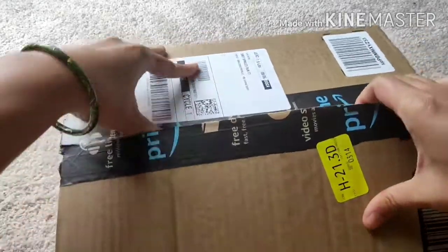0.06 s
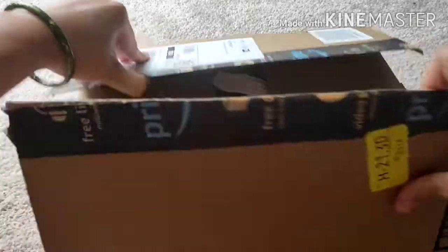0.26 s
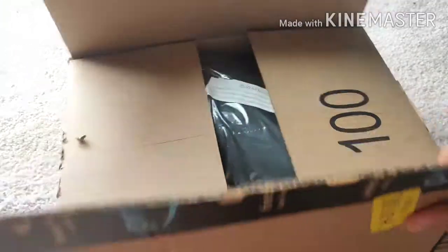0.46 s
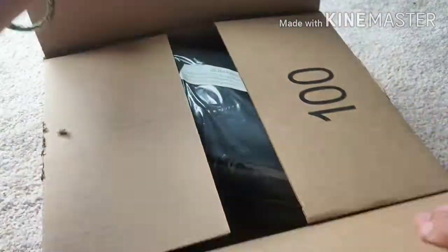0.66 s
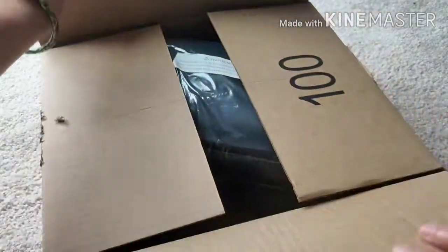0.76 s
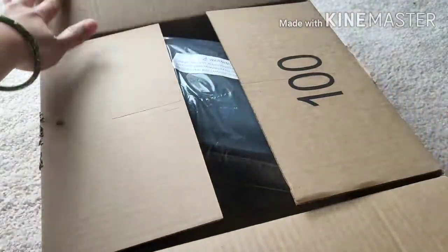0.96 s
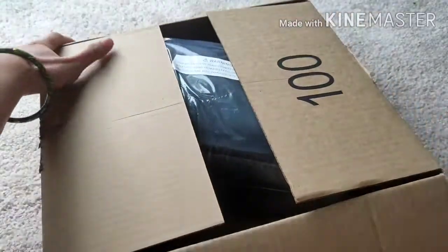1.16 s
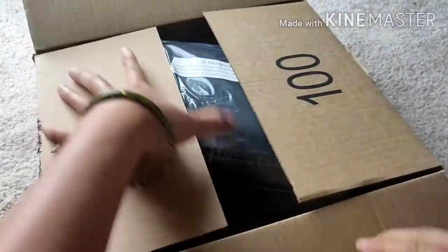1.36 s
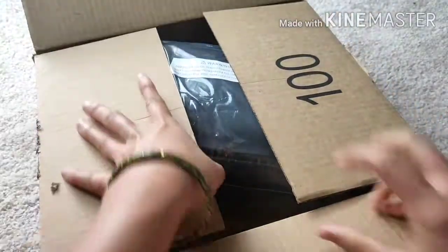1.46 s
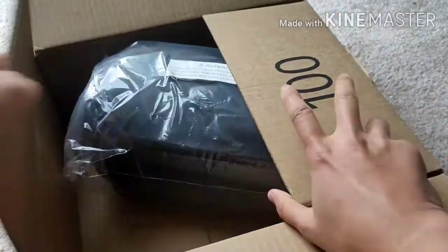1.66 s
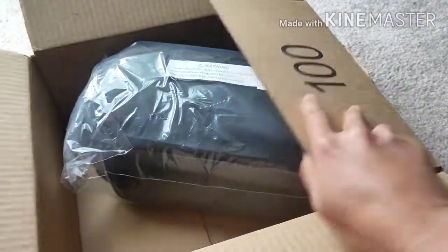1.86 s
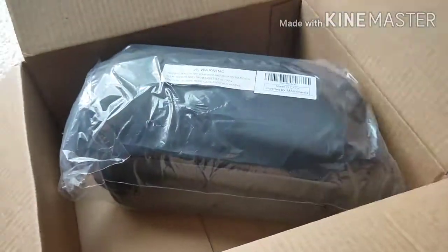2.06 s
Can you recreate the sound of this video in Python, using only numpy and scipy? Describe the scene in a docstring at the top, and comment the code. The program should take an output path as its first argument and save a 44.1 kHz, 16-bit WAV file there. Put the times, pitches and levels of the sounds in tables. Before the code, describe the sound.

Cardboard flaps snap open twice amid soft scraping and finger bumps in a small room.

```python
"""A small carpeted room, where hands fold open the flaps of a cardboard box close to a phone.
Two flaps snap over: the crease cracks, the panel gives a hollow knock, the loose flaps chatter.
Around the snaps fingers bump the panels, creases and nails tick, board rubs on board in tiny
slips, and a dry sliding hiss comes and goes, all in a short room tail over faint room tone."""
import sys
import numpy as np
from scipy import signal
from scipy.fft import rfft, irfft
from scipy.io import wavfile
from scipy.ndimage import uniform_filter1d

SR = 44100
rng = np.random.default_rng(int(sys.argv[2]) if len(sys.argv) > 2 else 0)


def generate_wav(sig):
    """Save sig (samples, or channels by samples) to the path in sys.argv[1] as 16-bit PCM at SR."""
    pcm = np.round(np.clip(np.atleast_2d(sig).T, -1, 1) * 32767).astype(np.int16)
    wavfile.write(sys.argv[1], SR, pcm)


N = 92610  # 2.1 s


def undb(db):
    """Decibels to gain."""
    return 10 ** (np.asarray(db) / 20)


def unit(x):
    """Scale to an rms of 1."""
    return x / np.sqrt(np.mean(x ** 2) + 1e-20)


def since(start):
    """Seconds since start, zero before it."""
    return np.maximum(np.arange(N) / SR - start, 0)


def fade(t, t60):
    """Exponential decay, 60 dB down after t60 seconds."""
    return np.exp(-np.log(1000) * np.maximum(t, 0) / max(t60, 1e-3))


def swell(t, rise, t60):
    """Smooth attack, then exponential decay."""
    return np.sin(np.pi / 2 * np.clip(t / max(rise, 1e-4), 0, 1)) ** 2 * fade(t - rise, t60)


def bins():
    """Frequency of each spectral bin."""
    return np.maximum(np.arange(N // 2 + 1) * SR / N, 1)


def curve(hz, values):
    """Join breakpoints along a log frequency axis."""
    return np.interp(np.log(bins()), np.log(hz), values)


def colour(x, points):
    """EQ through (f/Hz, level/dB) points, keeping the power of white noise."""
    hz, db = np.array(points).T
    return irfft(rfft(x) * unit(undb(curve(hz, db))), N)


def focus(hz, octave_db):
    """Bell curve around hz, octave_db down one octave away."""
    return undb(-octave_db * np.log2(bins() / hz) ** 2)


def spread(pair, wide_hz=1770):
    """Two unrelated signals to left and right: alike in the bass, apart in the treble."""
    width = bins() / np.hypot(bins(), wide_hz)
    mid, side = rfft(pair)
    return irfft(np.array([mid + width * side, mid - width * side]), N)


def noise():
    """White noise at the two microphones."""
    return spread(rng.standard_normal((2, N)))


def slips(per_s=1700, scatter_db=3):
    """Tiny stick-slip releases at random times and of uneven size."""
    hit = rng.random(N) < per_s / SR
    size = undb(scatter_db * rng.standard_normal(N))
    return spread(unit(hit * size * rng.standard_normal((2, N))))


# EQ of the still room: f/Hz, level/dB
ROOM_TONE_EQ = [(30, -6.5), (80, -8.5), (200, -8), (400, -1.5), (750, -5.5), (1030, 0.5), (1430, -26),
                (1900, -16), (3900, -29.5), (7400, -15), (8400, -25.5)]


def room_tone():
    """Still air: a faint, dark bed of steady noise."""
    return undb(-70) * colour(noise(), ROOM_TONE_EQ)


# Reverb bands: f/Hz, level against the send/dB, t60/s
REVERB_BANDS = [(59.5, -13, 1), (136, -10.5, 0.16), (316, -11.5, 0.2), (600, -21, 0.34), (950, -12.5, 0.31),
                (1980, -8.5, 0.27), (4000, -7.5, 0.22), (7500, -8.5, 0.2)]


def reverb(send, predelay_s=0.009, build_s=0.008, smooth_hz=45):
    """The carpeted room's short tail: each band has its own decay, and no single tone stands out."""
    hz, db, t60s = np.array(REVERB_BANDS).T
    scatter, t, tail = rfft(noise()), since(predelay_s), 0
    for share, t60 in zip(np.eye(len(hz)), t60s):
        band = irfft(scatter * curve(hz, share), N)
        tail = tail + band * swell(t, build_s, t60)
    response = rfft(tail)
    power = uniform_filter1d(np.mean(abs(response) ** 2, axis=0), int(smooth_hz * N / SR))
    tail = irfft(response / np.sqrt(power) * undb(curve(hz, db)), N)
    return signal.fftconvolve(send, tail[:, :N // 2], axes=1)[:, :N]


# Resonances of the box: f/Hz, width/Hz, relative level/dB
BOX_MODES = [(173, 160, 30), (319.4, 66, 4.5), (527, 26.7, 4), (871, 130, 14.5), (1750, 420, 10)]
# Gap between the resonances: f/Hz, width/Hz
BOX_NOTCHES = [(1450, 290)]
SLIP_FOCUS_DB, TOUCH_FOCUS_DB = 7, 4  # drop in drive one octave from a contact's centre


def box(drive, emphasis):
    """The hollow body: a contact stirs its resonances, weighted by the emphasis curve."""
    f = bins()
    gain = sum(undb(db) / (1 + 1j * (f / hz - hz / f) * hz / width) for hz, width, db in BOX_MODES)
    gain *= (1j * f / (110 + 1j * f)) ** 2  # low cut
    gain /= 1 + 1j * f / 1300 - (f / 1300) ** 2  # high cut
    for hz, width in BOX_NOTCHES:
        gain *= 1 - 1 / (1 + 1j * (f / hz - hz / f) * hz / width)
    return irfft(rfft(drive) * unit(gain * emphasis), N)


def radiate(motion, cut_hz=72):
    """Small panels lose their deepest bass."""
    return signal.sosfilt(signal.butter(2, cut_hz, "high", fs=SR, output="sos"), motion)


# Light slides of hands and flaps: t/s, length/s, hiss level/dB, rustle level/dB
SLIDES = [(0.034, 0.4, -66.5, -62), (0.417, 0.65, -66, -70), (1.053, 0.13, -68.5, -59.5),
          (1.2, 0.13, -68.5, -66), (1.342, 0.54, -65.5, -67), (1.843, 0.19, -68, -71),
          (2.003, 0.17, -65.5, -96)]
# EQ of the dry hiss: f/Hz, level/dB
HISS_EQ = [(500, -16.5), (2000, -11.5), (3900, -15.5), (5500, -12.5), (6400, -8), (7300, 3.5), (8400, -7.5)]


def sliding(edge_s=0.039, waver_db=2.37, waver_s=0.04, rustle_hz=198):
    """Skin and flaps slide lightly: a wavering hiss over a rustle of the box's lowest resonance."""
    hiss_gain, rustle_gain = np.zeros((2, N))
    for start, length, hiss_db, rustle_db in SLIDES:
        t = since(start)
        speed = np.clip(np.minimum(t, length - t) / edge_s, 0, 1)
        hiss_gain += undb(hiss_db) * speed
        rustle_gain += undb(rustle_db) * speed
    pressure = np.interp(since(0) / waver_s, np.arange(N), rng.standard_normal(N))
    hiss = hiss_gain * colour(noise(), HISS_EQ)
    rustle = box(rustle_gain * slips(), focus(rustle_hz, SLIP_FOCUS_DB))
    return undb(-waver_db * pressure) * (hiss + rustle)


# Rubbing strokes: t/s, length/s, body level/dB, grit level/dB, centre f/Hz
RUBS = [(0.0, 0.051, -55, -65, 528), (0.069, 0.033, -54.5, -68.5, 650), (0.152, 0.052, -57, -82, 695),
        (0.2262, 0.012, -44, -55.5, 846), (0.237, 0.0047, -39, -51, 224), (0.458, 0.034, -63, -69, 850),
        (0.827, 0.089, -57.5, -59, 560), (0.902, 0.083, -59, -62, 556), (1.09, 0.078, -60, -75, 452),
        (1.2396, 0.033, -49.5, -64.5, 760), (1.254, 0.03, -57, -55, 673), (1.37, 0.069, -61.5, -81, 837),
        (1.38, 0.087, -63, -72.5, 192), (1.508, 0.31, -65, -71, 807.5), (1.856, 0.033, -52.5, -87, 880),
        (1.822, 0.19, -59, -61.5, 443), (2.022, 0.089, -65.5, -91, 505)]
# EQ of the paper fibres' grit: f/Hz, level/dB
GRIT_EQ = [(300, -34), (1400, 3.5), (2100, 5.5), (3000, 3), (3900, 1.5), (4900, 1), (5800, 1), (7200, 13.5),
           (8400, 4.5)]


def rubs(rise_share=0.34):
    """Board rubs on board: slips drive the box and shed a fine grit."""
    body, grit_power = np.zeros((2, N)), np.zeros(N)
    for start, length, body_db, grit_db, hz in RUBS:
        force = np.sqrt(np.interp(since(start) / length, [0, rise_share, 1], [0, 1, 0]))
        body += undb(body_db) * box(force * slips(), focus(hz, SLIP_FOCUS_DB))
        grit_power += (undb(grit_db) * force) ** 2
    grit = colour((slips() + noise()) / np.sqrt(2), GRIT_EQ)
    return body + np.sqrt(grit_power) * grit


# Small catches: t/s, box ring level/dB, click level/dB, click f/Hz
TICKS = [(0.055, -57, -66.5, 1800), (0.2318, -32.5, -48.5, 2190), (0.88, -51, -58, 5700),
         (1.0811, -54.5, -56.5, 5620), (1.0884, -65, -55.5, 5400), (1.148, -62, -73, 5130),
         (1.269, -45.5, -58, 7400)]


def ticks(ring_hz=800):
    """A crease or a fingernail catches: a crisp click and a short ring of the box."""
    clicks, contact = np.zeros((2, N)), np.zeros(N)
    for start, ring_db, click_db, hz in TICKS:
        catch = swell(since(start), rise=0.00087, t60=0.023)
        band = irfft(rfft(noise()) * unit(focus(hz, octave_db=25.5)), N)
        clicks += undb(click_db) * catch * band
        contact += undb(ring_db) * catch
    return clicks + box(contact * noise(), focus(ring_hz, TOUCH_FOCUS_DB))


# Soft thuds of fingers and panels: t/s, level/dB, panel f/Hz, box ring level/dB
BUMPS = [(0.001, -35, 170, -44.5), (0.058, -49, 334, -67), (0.079, -63, 317, -54), (0.127, -40, 173.6, -55),
         (0.141, -58, 257, -58), (0.183, -50, 290, -58), (0.657, -49.5, 204, -63),
         (0.843, -47.5, 543, -57.5), (0.870, -41, 236, -50.5), (0.9, -38, 146.4, -57),
         (0.936, -38.5, 225, -59.5), (1.081, -49.5, 300, -54.5), (1.089, -39.5, 435, -62),
         (1.093, -35.5, 189, -85), (1.148, -50, 216, -61), (1.245, -42, 703, -67), (1.259, -39.5, 240, -65),
         (1.268, -43, 224, -72), (1.530, -49.5, 317, -59.5), (1.611, -47.5, 275, -51.5),
         (1.791, -45, 251, -77), (1.847, -52.5, 265, -54.5)]


def bumps(ring_hz=480):
    """Each soft contact sways one panel and stirs the box's lower resonances."""
    sway, contact = np.zeros((2, N))
    for start, db, hz, ring_db in BUMPS:
        t = since(start)
        sway += undb(db) * swell(t, rise=0.0062, t60=0.037) * np.sin(2 * np.pi * hz * t)
        contact += undb(ring_db) * swell(t, rise=0.003, t60=0.035)
    return radiate(sway) + box(contact * noise(), focus(ring_hz, TOUCH_FOCUS_DB))


def chatter(cues, centre_hz=416):
    """At each (t/s, level/dB) cue the loose flaps shiver on the box and settle."""
    force = sum(undb(db) * swell(since(start), rise=0.032, t60=0.11) for start, db in cues)
    return box(force * slips(), focus(centre_hz, SLIP_FOCUS_DB))


def knock(t, modes):
    """A flap's bending waves swell, the slow ones mostly last, and the lossy board soon stops them."""
    motion = np.zeros(N)
    for hz, db, rise, decay in modes:
        damping = fade(np.maximum(t - rise, 0) ** 2 / decay, decay)  # half a bell curve
        motion += undb(db) * swell(t, rise, t60=1e3) * damping * np.sin(2 * np.pi * hz * t)
    return radiate(motion)


# Bending modes of each flap: f/Hz, level/dB, attack/s, decay/s
OUTER_FLAP = [(159.8, -13, 0.0087, 0.018), (333.7, -9.5, 0.0128, 0.0081), (480, -35, 0.018, 0.015),
              (605.5, -25, 0.0089, 0.021), (743, -22, 0.0037, 0.013), (906, -18.5, 0.01, 0.0086),
              (1112, -27.5, 0.0075, 0.024), (1710, -31, 0.0029, 0.0083), (2144, -33.5, 0.0025, 0.009)]
INNER_FLAP = [(164, -40.5, 0.0075, 0.041), (310, -21, 0.0055, 0.031), (635, -38.5, 0.0015, 0.014),
              (749.5, -24, 0.004, 0.007), (836, -21, 0.0029, 0.0091), (970, -30, 0.0021, 0.029),
              (1983, -37.5, 0.0014, 0.014)]
# EQ of the crease's crack: f/Hz, level/dB
CRACK_EQ = [(100, 13.5), (1000, 19.5), (1450, 1.5), (2200, -1.5), (3200, 1.5), (3900, -10), (4700, -0.5),
            (5600, -6), (7100, 7), (8500, -3.5)]
# The two hits, outer flap then inner: t/s, knock level/dB, crack level/dB, crack hold/s, crack t60/s,
# knock's left lead/ms, knock's left minus right/dB, reverb send/dB, chatter level/dB
SNAPS = [(0.2466, -0.5, -24.5, 0.0018, 0.042, -0.11, 1, -5.5, -34.5),
         (1.6308, 0, -27.5, 0.002, 0.02, -0.15, -0.5, -3, -51)]


def snaps(crack_rise_s=0.00034):
    """A flap gives way: the crease cracks and the panel knocks. Returns direct sound and reverb send."""
    direct, send = np.zeros((2, 2, N))
    for cue, modes in zip(SNAPS, (OUTER_FLAP, INNER_FLAP)):
        start, knock_db, crack_db, hold, t60, lead_ms, pan_db, send_db, _ = cue
        t = since(start)
        burst = np.minimum(t / crack_rise_s, 1) * fade(t - hold, t60)
        snap = undb(crack_db) * burst * colour(noise(), CRACK_EQ)
        for channel, side in enumerate((1, -1)):
            arrival = start - side * lead_ms / 2000  # half the lead to each side
            snap[channel] += undb(knock_db + side * pan_db / 2) * knock(since(arrival), modes)
        direct += snap
        send += undb(send_db) * snap
    return direct, send


def scene(handling_send_db=0.5):
    """Two snaps up front and small handling sounds behind, in one reverb over room tone."""
    hits, send = snaps()
    handling = bumps() + rubs() + sliding() + ticks()
    handling += chatter([(start, db) for start, *_, db in SNAPS])
    return hits + handling + reverb(send + undb(handling_send_db) * handling) + room_tone()


def record(dry, top_hz=8550):
    """The phone cuts off the top steeply."""
    return signal.sosfilt(signal.ellip(10, 0.2, 70, top_hz, fs=SR, output="sos"), dry)


dry = scene()
out = record(dry)
generate_wav(out)
```